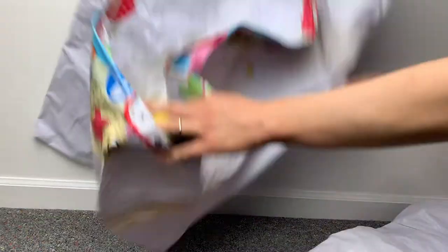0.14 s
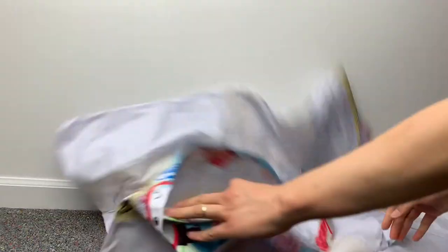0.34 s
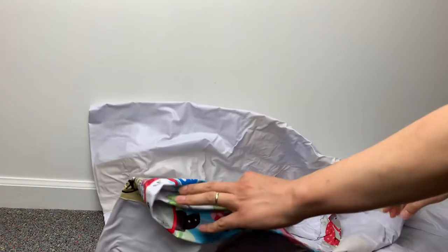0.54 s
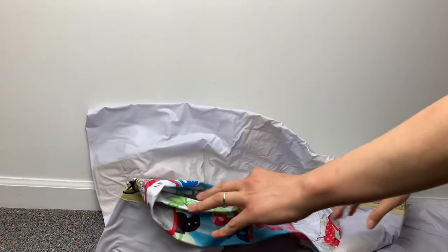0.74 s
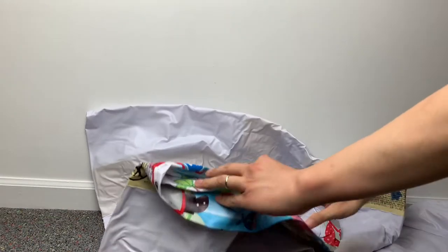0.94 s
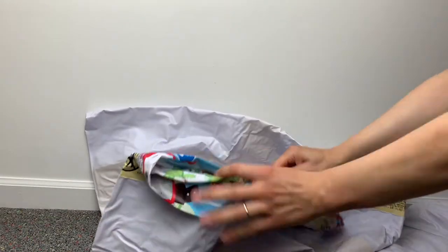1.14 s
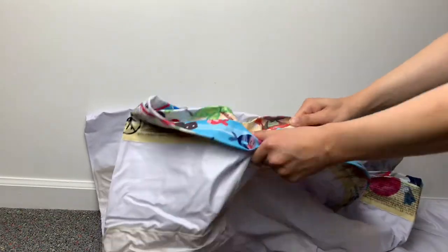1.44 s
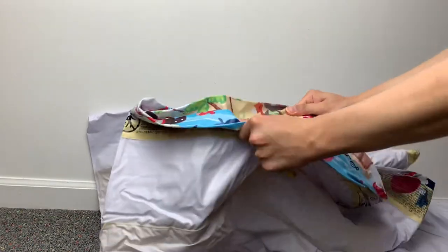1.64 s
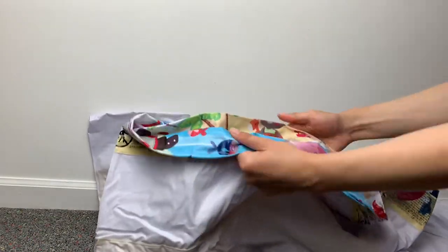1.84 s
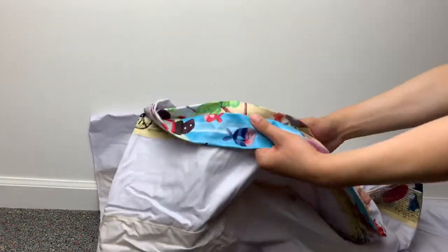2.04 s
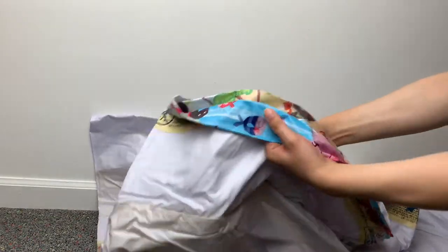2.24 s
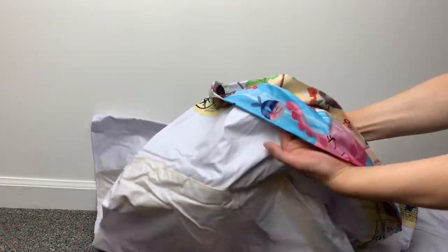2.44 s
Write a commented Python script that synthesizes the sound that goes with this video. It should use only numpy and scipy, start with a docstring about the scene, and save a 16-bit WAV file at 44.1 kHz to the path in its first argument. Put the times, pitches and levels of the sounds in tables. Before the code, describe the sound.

Thin plastic sheeting swishes and flops down loudly, then is softly rubbed and lifted with light knocks

```python
"""A deflated vinyl paddling pool is swung down onto carpet in a small room, heard close by.
The sheet swishes (shaped noise), slaps down (sagging tones and noise bursts) and collapses with a loud
rustle (dense clicks). Hands slide over it and lift its rim: it hisses and crinkles in streams of clicks
and pops its folds with light knocks. Standing waves and a short noise tail give the room's answer."""
import sys
import numpy as np
from scipy import signal
from scipy.fft import rfft, irfft
from scipy.io import wavfile
from scipy.ndimage import uniform_filter1d

SR = 44100
rng = np.random.default_rng(int(sys.argv[2]) if len(sys.argv) > 2 else 0)


def persist_wave(psi):
    """Save psi, clipped to +-1, as 16-bit WAV."""
    counts = np.round(np.clip(psi, -1, 1) * 32767).astype(np.int16)
    wavfile.write(sys.argv[1], SR, np.atleast_2d(counts).T)


N = 114660
TIME_S = np.arange(N) / SR


def undb(db):
    """Decibels to amplitude."""
    return 10 ** (np.asarray(db) / 20)


def log_gain(points, size):
    """Natural log of the gain at each frequency bin, from (hz, db) points."""
    hz, db = np.array(points, float).T
    bin_hz = np.fft.rfftfreq(size, 1 / SR)
    return np.log(undb(np.interp(np.log(bin_hz + 1), np.log(hz), db)))


def colour(x, points):
    """Causal minimum-phase filter from (hz, db) points; white noise keeps its power."""
    gain = log_gain(points, size=8192)
    cepstrum = irfft(gain - np.log(np.mean(np.exp(2 * gain))) / 2)
    half = len(cepstrum) // 2
    # fold the cepstrum onto positive time
    cepstrum[1:half] *= 2
    cepstrum[half + 1:] = 0
    impulse = irfft(np.exp(rfft(cepstrum)))[None, :half]
    return signal.fftconvolve(x, impulse, axes=1)[:, :x.shape[1]]


def widen(pair):
    """Two unrelated signals to left and right: alike in the bass, apart in the treble."""
    # stereo width: hz, side_against_mid_db
    width = [(60, -18), (150, -13.5), (300, -13.5), (640, -5), (1200, -5.5), (3000, -2.5), (6800, -0.5),
             (14000, 0)]
    size = pair.shape[1]
    side_gain = np.exp(log_gain(width, size))
    mid, side = rfft(pair[0]), rfft(pair[1]) * side_gain
    return irfft(np.array([mid + side, mid - side]) / np.sqrt(1 + side_gain ** 2), size)


def noise(size):
    """Stereo white noise."""
    return widen(rng.standard_normal((2, size)))


def grains(rate_per_s, spread_db):
    """Random clicks of uneven size, scaled to unit power."""
    size = undb(spread_db * np.minimum(rng.exponential(size=N), 4))
    clicks = (rng.random(N) < rate_per_s / SR) * size * rng.standard_normal((2, N))
    return widen(clicks / clicks.std())


def wobble(size):
    """Smooth random curve for each side, with unit spread."""
    x = rng.standard_normal((2, N))
    for _ in range(2):
        x = uniform_filter1d(x, size, axis=1)
    return x / x.std()


def swell(at_s, db, rise_s, fall_s, roundness=1):
    """A movement that speeds up and dies away, by 20 dB over rise and fall."""
    t = TIME_S - at_s
    return undb(db - 20 * np.maximum(-t / rise_s, t / fall_s) ** roundness)


def add(out, at_s, x):
    """Mix x into out from at_s, cut at the end."""
    i = int(at_s * SR)
    out[:, i:i + x.shape[1]] += x[:, :N - i]


def flap(thump_db, thump_hz, smack_db, smack_hz, smack_decay_s, tick_db, cycles, sag):
    """A slack panel swings briefly as its pitch sags; the contact smacks and a crease ticks."""
    # tick spectrum: hz, level_db
    tick_colour = [(500, -23), (2500, -5), (6000, -4.5), (11000, 4.5), (16000, -12)]
    # smack spectrum about its centre: multiple_of_centre, level_db
    smack_shape = [(.1, -21), (.5, 0.5), (1, 2.5), (1.6, -4.5), (3, -14.5), (7, -26.5), (25, -42)]
    thump_lag_s, smack_attack_s = 0.00063, 0.0015
    tick_attack_s, tick_decay_s = 0.0025, 0.0033

    t = np.arange(SR // 5) / SR
    age = np.maximum(t - thump_lag_s, 0) * thump_hz / cycles  # swing peaks at age 1
    steady, sagging = (1 - sag) * age, sag * np.pi * (1 - np.exp(-age / 2))
    thump = np.sin(2 * np.pi * cycles * (steady + sagging)) * age * np.exp(1 - age)

    smack_env = (1 - np.exp(-t / smack_attack_s)) * np.exp(-t / smack_decay_s)
    smack = colour(noise(len(t)) * smack_env, [(k * smack_hz, db) for k, db in smack_shape])
    tick_env = (1 - np.exp(-t / tick_attack_s)) * np.exp(-t / tick_decay_s)
    tick = colour(noise(len(t)) * tick_env, tick_colour)
    return undb(thump_db) * thump + undb(smack_db) * smack + undb(tick_db) * tick


def background():
    """Steady shaped noise under everything."""
    # spectrum: hz, level_db
    floor_colour = [(25, -22.5), (40, -7), (60, 3), (100, -13), (240, -16.5), (355, -9.5), (550, -25.5),
                    (1000, -24.5), (3000, -43.5), (7000, -47), (15000, -67)]
    return undb(-56.5) * colour(noise(N), floor_colour)


def crinkling():
    """Soft crumpling as the sheet is flexed, with single buckles that each have their own pitch."""
    # how hard the sheet is flexed: time_s, crinkle_db
    flex = [(0, -48.5), (.2, -54), (0.272, -36), (.39, -32.5), (0.468, -44), (.56, -76), (0.679, -68),
            (.88, -58.5), (1.0, -63), (1.17, -51.5), (1.4, -54.5), (1.55, -50), (1.68, -55.5),
            (1.78, -63.5), (1.96, -55.5), (2.12, -57), (2.23, -51), (2.29, -53), (2.45, -50.5),
            (2.52, -67.5), (2.6, -43.5)]
    # spectrum: hz, level_db
    crinkle_colour = [(40, -22), (90, 3.5), (170, 3.5), (350, -0.5), (600, -5), (1000, -13), (1900, -12),
                      (3200, -23), (6000, -53.5), (15000, -75)]
    buckles_per_s, base_db, spread_db, decay_cycles = 88, -4.5, 3, 2.3
    lowest_hz, range_octaves, tilt_db_per_octave = 288, 3.76, 2.5

    effort = undb(np.interp(TIME_S, *np.array(flex).T))
    crumple = colour(grains(rate_per_s=600, spread_db=-0.5) * effort, crinkle_colour)

    buckles = np.zeros((2, N))
    t = np.arange(SR // 20) / SR
    for when, chance, pitch, force, side in rng.random(size=(1000, 5)):
        if chance < buckles_per_s * N / SR / 1000:
            octaves = range_octaves * pitch
            cycles = t * lowest_hz * 2 ** octaves
            db = base_db + tilt_db_per_octave * octaves - spread_db * np.log(max(force, .03))
            envelope = np.exp(-cycles / decay_cycles) * (1 - np.exp(-2 * cycles))
            ring = undb(db) * np.sin(2 * np.pi * cycles) * envelope
            pan = np.sqrt([[2 * side], [2 - 2 * side]])
            add(buckles, when * N / SR, pan * ring)
    return crumple + buckles * effort


def sliding():
    """Vinyl over vinyl or skin: dense tiny slips hiss with each stroke, juddering a little."""
    # strokes: fastest_s, level_db, rise_s, fall_s (20 dB each way)
    strokes = [(.115, -46, 0.33, 0.12), (.24, -44, 0.28, 0.18), (.64, -69, 0.063, 0.14),
               (.895, -59.5, 0.088, 0.028), (0.989, -56.5, 0.052, 0.26), (1.092, -50.5, 0.067, 0.028),
               (1.19, -54.5, 0.069, 0.096), (1.29, -55.5, 0.18, 0.19), (1.42, -52, 0.095, 0.23),
               (1.539, -51.5, 0.29, 0.13), (1.696, -53.5, 0.21, 0.066), (1.814, -54.5, 0.029, 0.091),
               (1.99, -52, 0.16, .09), (2.06, -50.5, 0.086, 0.14), (2.2, -50.5, 0.052, 0.17),
               (2.36, -57.5, 0.22, 0.26), (2.46, -55, 0.17, 0.038), (2.595, -48, 0.085, .08)]
    # spectrum: hz, level_db
    slide_colour = [(200, -10), (800, -4.5), (2000, 0), (3200, 1), (4500, 2.5), (7000, 2), (8400, -12.5),
                    (10500, 4), (13300, -5), (15500, 1)]
    judder_rms_db = 1.97

    speed = np.sqrt(sum(swell(*stroke, roundness=1.4) ** 2 for stroke in strokes))
    judder = uniform_filter1d(rng.standard_normal(N), size=400)
    judder_gain = undb(judder_rms_db * judder / judder.std())
    slips = grains(rate_per_s=12000, spread_db=-1.5)
    return colour(slips * speed * judder_gain, slide_colour)


def folds():
    """Light knocks that drop in pitch as a fold pops over."""
    # pops: start_s, knock_db, knock_hz, snap_db, snap_hz, tick_db
    fold_pops = [(.018, -37.5, 452, -37.5, 1210, -56), (.912, -58, 300, -45, 1410, -96),
                 (0.981, -45, 356, -57, 813, -46), (1.039, -40.5, 348, -64, 610, -52),
                 (1.177, -38, 224, -39.5, 710, -39.5), (1.289, -42, 316, -32.5, 850, -62),
                 (1.324, -26.5, 188, -35.5, 720, -33), (1.432, -40, 324, -41, 605, -60),
                 (1.518, -37.5, 244, -47, 704, -40), (1.548, -38.5, 330, -43.5, 1000, -40.5),
                 (1.578, -42.5, 200, -62, 700, -64), (1.62, -40, 338, -44.5, 1230, -59),
                 (1.803, -47.5, 232, -50, 1220, -43.5), (1.947, -52, 300, -51, 750, -62),
                 (1.925, -46, 305, -44, 1030, -52), (2.033, -31, 276, -39, 780, -33),
                 (2.133, -39.5, 263, -38.5, 1390, -47), (2.187, -35, 216, -40.5, 770, -36.5),
                 (2.219, -40, 172, -42, 780, -60), (2.067, -42, 200, -40.5, 750, -51),
                 (2.417, -45.5, 208, -37.5, 1300, -57), (2.434, -35.5, 247, -38, 790, -49),
                 (2.463, -66, 197, -37, 1390, -65), (2.587, -32.5, 230, -31, 1380, -30)]
    out = np.zeros((2, N))
    for at_s, knock_db, knock_hz, snap_db, snap_hz, tick_db in fold_pops:
        pop = flap(knock_db, knock_hz, snap_db, snap_hz, smack_decay_s=0.0056, tick_db=tick_db,
                   cycles=0.89, sag=.85)
        add(out, at_s, pop)
    return out


def zips_of_grain():
    """Fast slides over the embossed surface give rough, rising whistles."""
    # whistles: peak_s, level_db, centre_hz
    zips = [(0.09, -31, 10550), (0.106, -42, 6540)]
    rise_s, fall_s = 0.026, .06
    glide_hz_per_s, scatter_rms_hz = 22000, 563

    out = np.zeros((2, N))
    for at_s, db, centre_hz in zips:
        glide_hz = glide_hz_per_s * np.clip(TIME_S - at_s, -rise_s, fall_s / 2)
        hz = centre_hz + glide_hz + scatter_rms_hz * wobble(size=12)
        whistle = np.sqrt(2) * np.sin(2 * np.pi * np.cumsum(hz, axis=1) / SR)
        out += whistle * wobble(size=30) * swell(at_s, db, rise_s, fall_s)
    return out


def swish():
    """The falling sheet pushes air aside: a swell of low-weighted noise."""
    # spectrum: hz, level_db
    swish_colour = [(40, -12), (70, -1), (300, 5), (600, 6), (950, -6.5), (2000, -17.5), (4000, -34.5),
                    (15000, -41)]
    return colour(noise(N) * swell(at_s=0.25, db=-33, rise_s=0.11, fall_s=0.048), swish_colour)


def slaps():
    """The slaps of the landing: panels thump, smack and tick."""
    # blows: start_s, thump_db, thump_hz, smack_db, smack_hz, smack_decay_s, tick_db
    slap_blows = [(.2443, -10, 850, -14, 1900, .006, -28), (.2461, -8, 240, -8, 380, .008, -35),
                  (.262, -17, 190, -23, 480, .008, -52), (.289, -19, 185, -31, 500, .008, -55),
                  (.3228, -15, 200, -25, 600, .006, -27), (.3825, -14, 440, -13, 600, .011, -44),
                  (.463, -33, 200, -33, 500, .012, -50), (.522, -36, 150, -44, 400, .01, -65)]
    out = np.zeros((2, N))
    for at_s, *blow in slap_blows:
        add(out, at_s, flap(*blow, cycles=0.73, sag=0.31))
    return out


def collapse():
    """Trapped air rushes out from under the sheet, then its creases crush together."""
    # spectra: hz, level_db
    air_colour = [(25, -21), (45, 13), (64, 3), (100, 6.5), (180, -1), (260, 0), (450, -8.5), (900, -14.5),
                  (2000, -23), (5000, -23), (15000, -73)]
    rustle_colour = [(100, -8), (350, 13.5), (800, -1), (1200, 2), (1900, 0), (3000, -6), (4500, -6.5),
                     (7000, -4), (8400, -23.5), (10200, 0), (13000, -11), (15500, -7)]
    rustle_start_s = .3235

    air = noise(N) * swell(at_s=0.27, db=-27, rise_s=0.035, fall_s=0.27)
    crush = swell(at_s=0.38, db=-25, rise_s=0.22, fall_s=0.086) * (TIME_S > rustle_start_s)
    creases = grains(rate_per_s=2000, spread_db=1) * crush
    return colour(air, air_colour) + colour(creases, rustle_colour)


def room(x):
    """A short diffuse tail of fading noise, and a few standing waves that ring on."""
    # resonances: pitch_hz, relative_db, t60_s
    room_modes = [(59.85, -5, 0.7), (126.6, -13.5, 0.29), (170.4, -13.5, 0.37), (191.1, -12, 0.33),
                  (245, -29.5, 0.27), (352, -20, 0.91), (451, -14, .45), (657, -17, 0.46), (868, -6.5, 0.2)]
    tail_db, delay_s, split_hz, t60_low_s, t60_high_s = -3, 0.0046, 520, 0.23, 0.25

    t = np.arange(SR) / SR

    def fade(t60_s):
        """Exponential decay by 60 dB over t60_s."""
        return np.exp(-np.log(1000) * t / t60_s)

    wash = noise(len(t))
    low = signal.sosfilt(signal.butter(2, split_hz, fs=SR, output="sos"), wash)
    tail = (low * fade(t60_low_s) + (wash - low) * fade(t60_high_s)) * (t > delay_s)
    tail *= undb(tail_db) / np.sqrt(np.sum(tail ** 2) / 2)  # tail_db sets the energy per side

    modes = sum(undb(db) * fade(t60_s) * np.cos(2 * np.pi * hz * t) for hz, db, t60_s in room_modes)
    modes = modes * 2 * np.pi * 20 / SR
    return signal.fftconvolve(x, tail + modes, axes=1)[:, :N]


def balance(x):
    """Lean each band to the left or the right."""
    # lean: hz, left_gain_db (the right loses as much)
    lean = [(100, 1.3), (200, 0), (380, -0.4), (680, 1.7), (1300, 0), (2400, 0.4), (4400, -1.35), (9000, 0)]
    gain = np.exp(log_gain(lean, N) * np.array([[1], [-1]]))
    return irfft(rfft(x) * gain, N)


def scene():
    """Landing and handling, direct and through the room, over the background."""
    handling_room_db = -2  # the hands are nearer than the floor
    handling = crinkling() + sliding() + folds()
    landing = zips_of_grain() + swish() + slaps() + collapse()
    sheet = landing + handling + room(landing + undb(handling_room_db) * handling)
    return balance(sheet) + background()


def record(dry):
    """Steep low-pass: the top is cut."""
    top_hz = 16100
    return signal.sosfilt(signal.ellip(10, .2, 80, top_hz, fs=SR, output="sos"), dry)


dry = scene()
out = record(dry)
persist_wave(out)
```